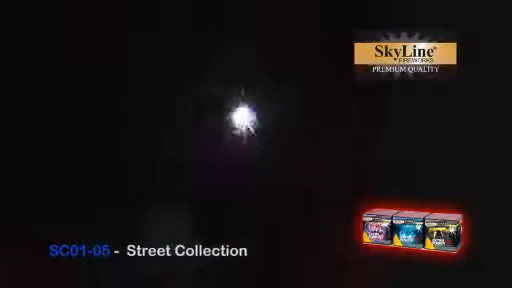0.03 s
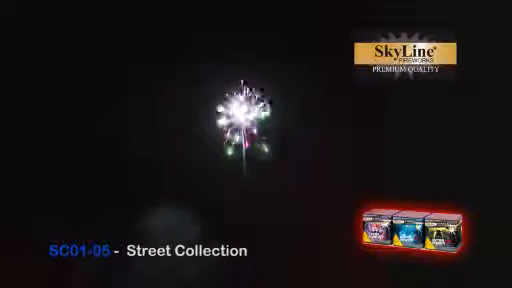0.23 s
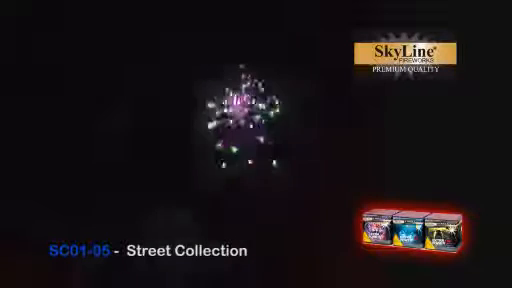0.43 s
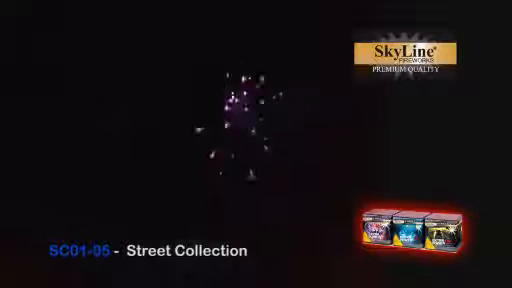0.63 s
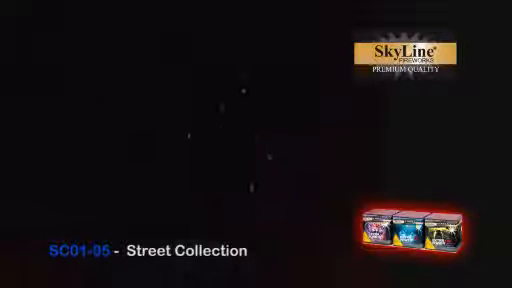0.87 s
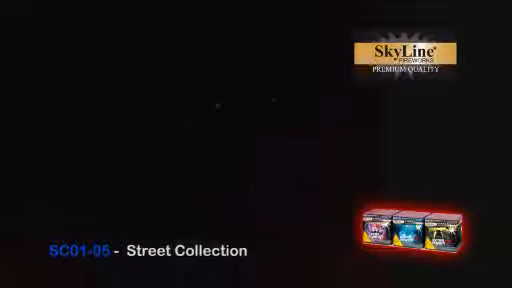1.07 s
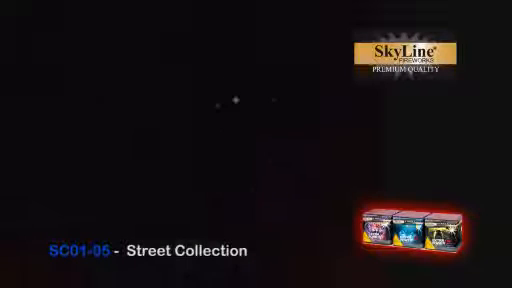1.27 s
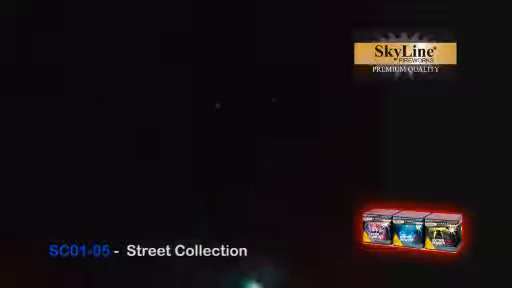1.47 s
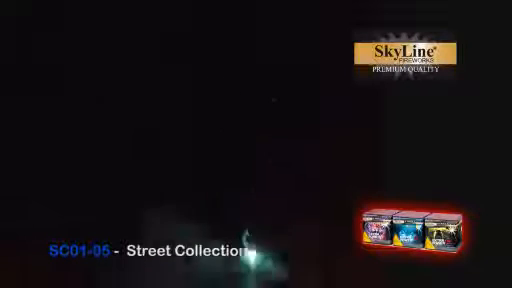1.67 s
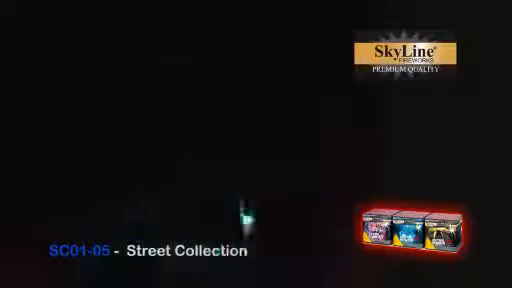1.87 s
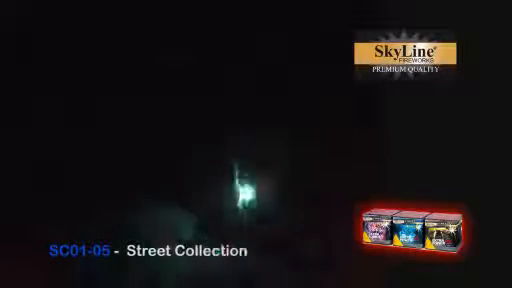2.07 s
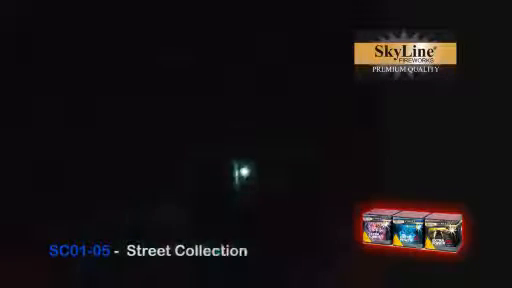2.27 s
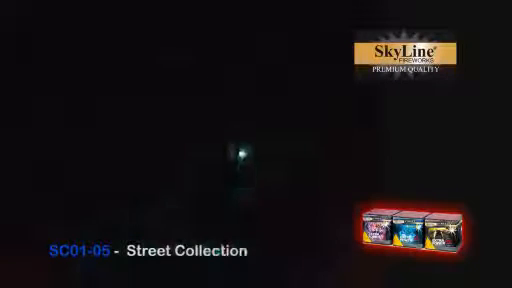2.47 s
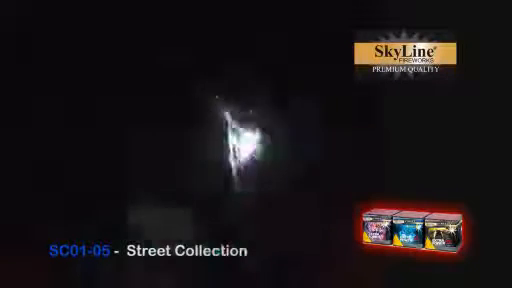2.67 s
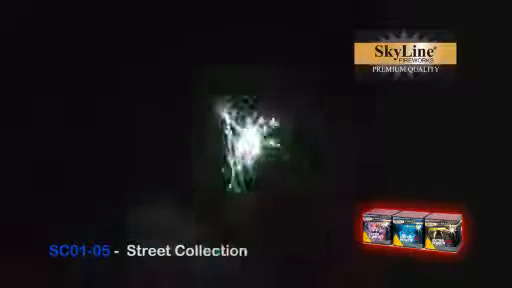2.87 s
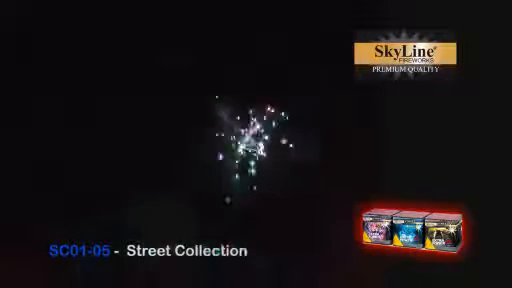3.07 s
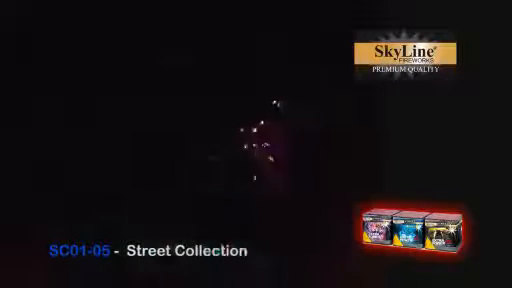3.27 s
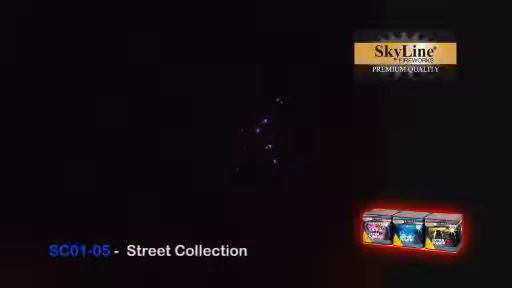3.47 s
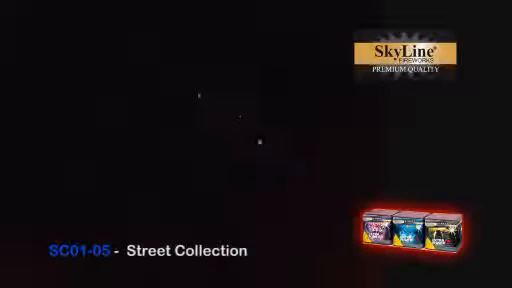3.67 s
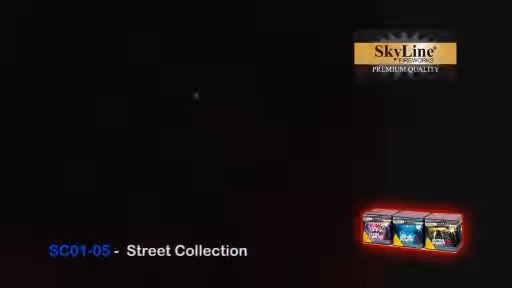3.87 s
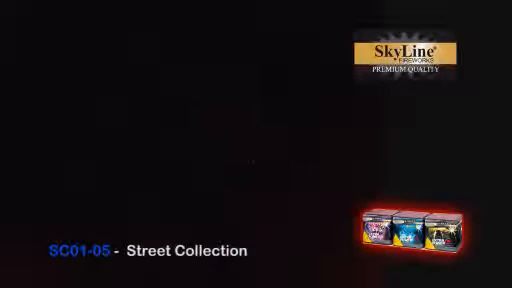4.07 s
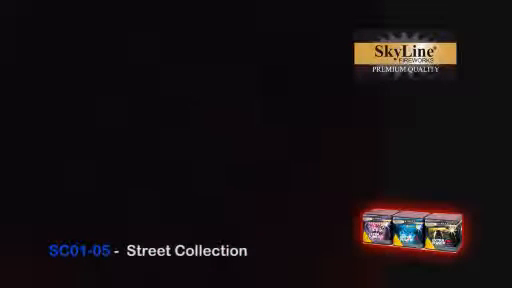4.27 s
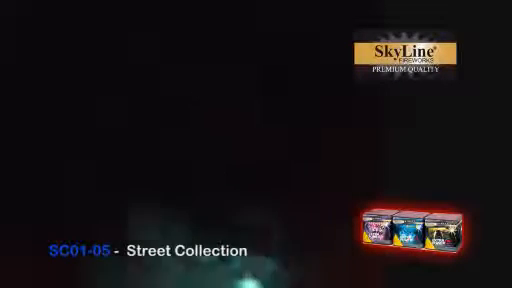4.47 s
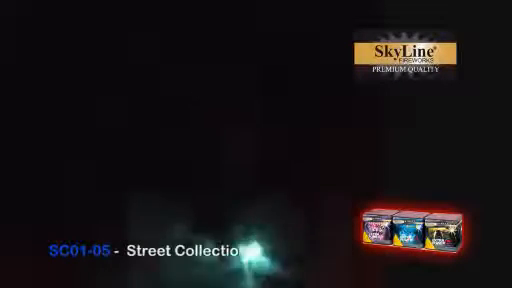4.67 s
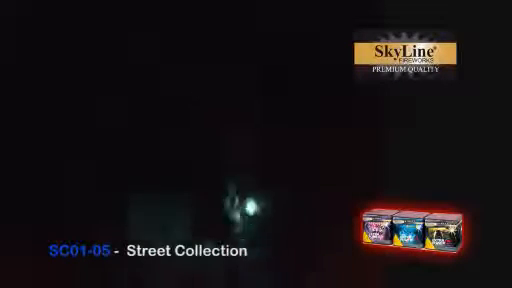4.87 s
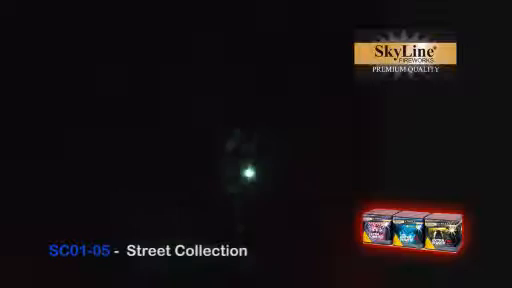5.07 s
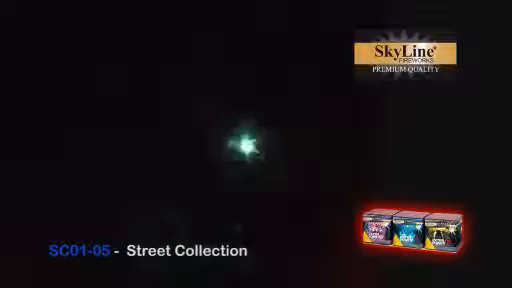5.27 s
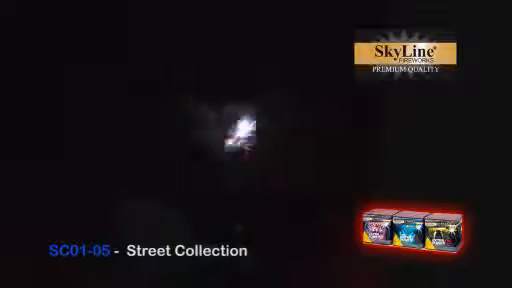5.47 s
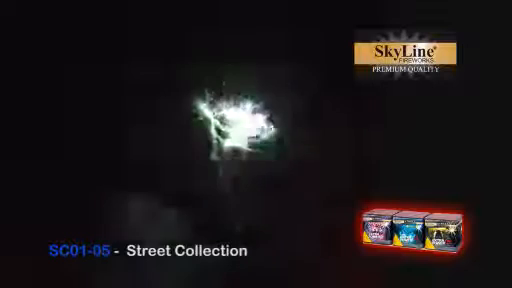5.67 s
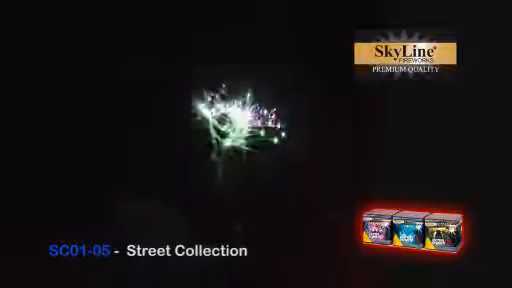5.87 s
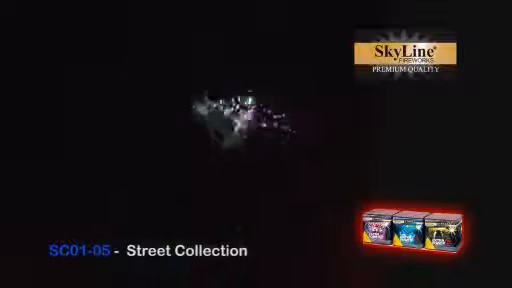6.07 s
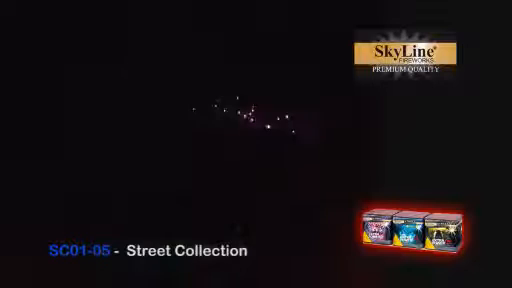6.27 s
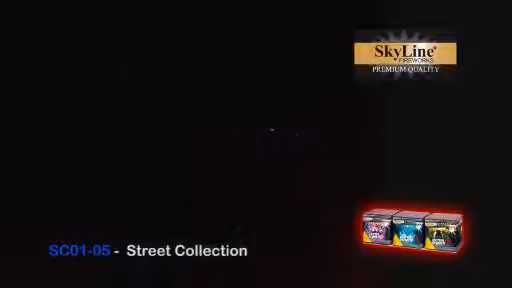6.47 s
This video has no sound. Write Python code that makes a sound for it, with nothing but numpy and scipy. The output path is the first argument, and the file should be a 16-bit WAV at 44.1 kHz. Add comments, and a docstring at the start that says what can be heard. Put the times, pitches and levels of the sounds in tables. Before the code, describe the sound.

Three sharp firework bangs crack across a quiet night, each followed by fluttering echoes and a fading wash, with two softer launch pops between them.

```python
"""Open surroundings at night: a firework cake fires, three sharp bursts in the sky alternating with two lifts.
A burst is an N-shaped shock; a lift is a muzzle crack plus the dull thump of the tube's air column.
Each shot also returns via the ground (a burst) or the cake (a lift), as slaps from buildings, and as a
long wash of scattered sound that loses its treble to the air. An added reverb effect gives every shot the same
fluttering echoes. Filtered noise makes the quiet night; an inverting microphone thins the bass and cuts the top."""
import sys
import numpy as np
from scipy import signal
from scipy.fft import rfft, irfft
from scipy.io import wavfile
from scipy.ndimage import uniform_filter1d

SR = 44100
rng = np.random.default_rng(int(sys.argv[2]) if len(sys.argv) > 2 else 0)


def wrap_up_sound(samples):
    """Save the sound to the file named by the first command line argument, as 16-bit audio."""
    columns = np.atleast_2d(samples).T
    # keep every value between -1 and 1, then stretch to whole-number steps
    tamed = np.clip(columns, -1, 1)
    steps = np.round(tamed * 32767).astype(np.int16)
    wavfile.write(sys.argv[1], SR, steps)


N = 287973

# Levels are ahead of the microphone.
# Night noise spectrum. Each row: frequency in Hz, relative density in dB per Hz.
NIGHT_SPECTRUM = [(24, 6), (45, 4.5), (198, -3), (569, -16), (1020, -10), (1130, -18), (10000, -35.5),
                  (11000, -32), (14300, -80), (22000, -120)]
# Zones of scatterers, each swelling in and dying away: ground near the listener, the whole landscape,
# nearby houses, far buildings. Each row: arrival in s, rise in s, t60 in s, level in dB after bursts,
# level in dB after lifts.
SCATTER_ZONES = [(0, 0.0011, 0.05, -3, -11), (0, 0.0043, 5.4, -29.5, -30.5), (.054, .011, .85, -18, -20),
                 (0.501, 0.16, 2.1, -33, -29)]
# Colour of all scattered sound. Each row: band centre in Hz, gain in dB after bursts, gain in dB after lifts,
# loss in dB per s of delay.
SCATTER_COLOUR = [(49.3, -9.5, -6.5, 3.5), (113, 1.5, 0.5, -0.5), (200, 1, -11, 3), (278, 2.5, 10.5, 5),
                  (520, -7, -6.5, -0.5), (1000, -1.5, -10, -1), (1580, 2, 9.5, 0.5), (2180, -1, 14, 3),
                  (2800, 2, 1, 3), (4100, 2.5, 3, 7), (5090, 5, 2.5, 13), (5970, 2, 2, 9.5),
                  (6950, -1, 5.5, 23.5), (9500, -0.5, -4, 27)]
# Slaps from buildings, after bursts and after lifts. Each row: delay in s, gain in dB before filtering,
# corner in Hz of each of two low-passes, t60 in s of the rough wake behind the front.
BURST_BUILDING_SLAPS = [(.038, -32, 4000, .01), (.046, -35, 1500, .01), (.49, -43, 1500, .02),
                        (.5708, -33.5, 3000, .1), (.73, -41, 1200, .02), (2.366, -46, 900, .02)]
LIFT_BUILDING_SLAPS = [(.1845, -16, 900, .002), (.205, -25, 900, .002), (.255, -22, 900, .002),
                       (.3103, -21, 900, .002), (.358, -17, 900, .002), (.3644, -22, 900, .002),
                       (.388, -32, 900, .002), (.586, -18, 1200, .012), (.5965, -24, 1800, .012),
                       (.648, -28, 1500, .004), (.667, -28, 1500, .004), (.72, -31, 2000, .004),
                       (1.04, -27, 900, .002), (1.1, -30, 900, .002)]
# Echoes of the added reverb effect, alike for every shot, in two families, one per flutter gap.
# Each row of a family: delay in ms, signed gain before the flutter.
REVERB_ECHOES = [
    [(57.1, .18), (78.89, .18), (104.78, -.08), (117.82, .13), (130.88, .065), (143.9, .03), (156.96, .025)],
    [(68.8, -.165), (86.12, .085), (105.35, -.125), (124.58, -.06), (182.27, -.025)],
]
# Lifts. Each row: start in s, muzzle crack gain in dB, crack bounce gain in dB (both on the filtered crack),
# tube thump peak in dB.
LIFT_SHOTS = [(1.38298, -11, -21, -24), (4.45976, -8, -11, -23)]
# Bursts. Each row: start in s, peak in dB, shock length in ms, suction as a share of the peak,
# ground bounce delay in ms, bounce gain in dB before dulling, extra delay of far slaps in ms.
BURST_SHOTS = [(.11443, 0, .77, .6, 4.94, -6, 0), (2.71334, 0, .79, .62, 4.42, -5, 4.6),
               (5.59872, -.4, .72, .5, 4.79, -6, 1.4)]

NIGHT_RMS_DB, NIGHT_WAVER_STEP = -70, 2000  # RMS before the waver; step in samples
WASH_GRAIN_DB = 1.2  # mean of the random lift in scatterer size
WASH_PATCHY_DB, WASH_PATCH_S = 1.7, .012
SLAP_BASS_HZ, FAR_SLAP_S = 120, .1  # slaps later than this count as far
WAKE_DB = -23  # spread per sample, against the front
FLUTTER_GAPS_MS, FLUTTER_GAIN = (4.875, 6.576), .7
REVERB_TOP_HZ = 8500
TUBE_HZ, TUBE_T60_S, TUBE_PUSH_MS, TUBE_LAG_MS = 188, .017, 2.3, .85
MUZZLE_HZ, MUZZLE_T60_S, MUZZLE_DB = 2642, .0014, -7  # dB against the unfiltered crack
SECOND_CRACK_MS = .38
MIC_LOW_HZ, MIC_DAMPING, MIC_TOP_HZ = 145, .6, 10000
MIC_DIP_HZ, MIC_DIP_Q, MIC_DIP_SHARE = 7630, 2.2, .35
TOP_HZ = 10300


def undb(db):
    """Decibels to gain."""
    return 10 ** (np.asarray(db) / 20)


def place(pulse, start_s):
    """A silent track of N samples with the pulse starting at start_s."""
    return np.pad(pulse, (int(round(start_s * SR)), N))[:N]


def dull(x, hz):
    """Gentle first-order low-pass."""
    return signal.lfilter(*signal.butter(1, min(hz, .45 * SR), fs=SR), x)


def ring(hz, t60_s):
    """One decaying mode, 0.1 s long."""
    t = np.arange(SR // 10) / SR
    return np.sin(2 * np.pi * hz * t) * np.exp(-np.log(1000) * t / t60_s)


def shape_spectrum(x, hz, gain):
    """Weight the spectrum, interpolating over log frequency."""
    f = np.maximum(np.fft.rfftfreq(len(x), 1 / SR), 1)
    return rfft(x) * gain(np.log(f), np.log(hz))


def band(x, hz, k):
    """Band k of a bank of overlapping slopes around the centres hz; the bands add up to x."""
    is_band = np.arange(len(hz)) == k
    return irfft(shape_spectrum(x, hz, lambda f, centres: np.interp(f, centres, is_band)), len(x))


def night():
    """Quiet background: shaped noise whose level wavers slowly."""
    hz, db = np.transpose(NIGHT_SPECTRUM)
    white = rng.standard_normal(N)
    x = irfft(shape_spectrum(white, hz, lambda f, points: undb(np.interp(f, points, db))), N)
    steps = np.repeat(rng.standard_normal(N // NIGHT_WAVER_STEP + 1), NIGHT_WAVER_STEP)
    waver = uniform_filter1d(steps, size=NIGHT_WAVER_STEP)[:N]
    return undb(NIGHT_RMS_DB + .68 * waver) * x / x.std()


def patches(size):
    """Slow chance with spread near 1: scatterers stand in clumps."""
    step = int(WASH_PATCH_S * SR)
    steps = np.repeat(rng.standard_normal(size // step + 1), step)
    return 1.2 * uniform_filter1d(steps, step)[:size]


def scattered_wash(t, column):
    """Response of many small scatterers: noise under the zones' decays, coloured band by band."""
    power = 0
    for arrival_s, rise_s, t60_s, *db in SCATTER_ZONES:
        decay = undb(db[column] - 60 * np.maximum(t - arrival_s, 0) / t60_s)
        power = power + np.clip((t - arrival_s) / rise_s, 0, 1) * decay ** 2
    # scatterers of uneven size
    dust = rng.standard_normal(len(t)) * undb(WASH_GRAIN_DB * rng.exponential(size=len(t)))
    dust *= np.sqrt(power / (SR / 50)) / dust.std()  # zone levels refer to 20 ms of sound
    centres_hz = np.array(SCATTER_COLOUR)[:, 0]
    wash = 0
    for k, row in enumerate(SCATTER_COLOUR):
        level_db = row[1 + column] - row[-1] * t + WASH_PATCHY_DB * patches(len(t))
        wash = wash + undb(level_db) * band(dust, centres_hz, k)
    return wash


def building_slap(t, delay_s, slap_db, top_hz, t60_s):
    """One wall's reflection: a front and a rough decaying wake, both band-limited."""
    wake_t = t[:SR // 5]
    wake = rng.standard_normal(len(wake_t)) * undb(WAKE_DB - 60 * wake_t / t60_s)
    raw = place(undb(slap_db) * np.append(1, wake), delay_s)[:len(t)]
    slap = dull(dull(raw, top_hz), top_hz)
    return slap - dull(slap, SLAP_BASS_HZ)  # walls of finite size return little bass


def surroundings(slaps, column, late_ms=0):
    """Response of the far surroundings: scattered wash plus single slaps; column 0 for bursts, 1 for lifts."""
    t = np.arange(3 * SR) / SR
    response = scattered_wash(t, column)
    for delay_s, slap_db, top_hz, t60_s in slaps:
        extra_s = (delay_s > FAR_SLAP_S) * late_ms / 1000
        response += building_slap(t, delay_s + extra_s, slap_db, top_hz, t60_s)
    return response[:len(t) - SR // 4]


def reverb_effect(x):
    """Added reverb: all-passes turn each echo into a flutter, an inverted front then fading repeats one gap apart."""
    out = 0
    for gap_ms, echoes in zip(FLUTTER_GAPS_MS, REVERB_ECHOES):
        taps = np.zeros(int(round(gap_ms * SR / 1000)) + 1)
        taps[0], taps[-1] = -FLUTTER_GAIN, 1
        response = sum(gain * place(np.ones(1), ms / 1000)[:SR // 5] for ms, gain in echoes)
        flutter = signal.lfilter(taps, taps[::-1], np.pad(response, (0, SR // 5)))
        out = out + signal.fftconvolve(x, flutter)[:N]
    return dull(out, REVERB_TOP_HZ)


def lift(crack_db, second_db, thump_db, crack_ms=.065):
    """A crack and short ring at the muzzle, one thump of the tube's air column; and the crack's bounce off the cake."""
    ms = np.arange(SR // 10) / SR * 1000
    crack = np.exp(-ms / crack_ms) - undb(MUZZLE_DB) * ring(MUZZLE_HZ, MUZZLE_T60_S)
    crack = dull(crack, hz=6360) - dull(crack, hz=520)  # a small opening, heard along the ground
    second = place(crack, SECOND_CRACK_MS / 1000)[:len(ms)]
    push = np.sin(np.pi * np.clip((ms - TUBE_LAG_MS) / TUBE_PUSH_MS, 0, 1)) ** 2
    thump = signal.fftconvolve(push, ring(TUBE_HZ, TUBE_T60_S))[:len(ms)]
    thump /= np.abs(thump).max()
    return undb(crack_db) * crack - undb(thump_db) * thump, undb(second_db) * second


def burst(db, length_ms, suction, bounce_ms, bounce_db, release_ms=.42, ground_hz=2300):
    """N-shaped shock: a jump, a ramp into suction, a soft release; and its duller bounce off the ground."""
    ms = np.arange(SR // 50) / SR * 1000
    ramp = 1 - (1 + suction) * ms / length_ms
    release = -suction * np.exp(-(ms - length_ms) / release_ms)
    shock = undb(db) * np.where(ms < length_ms, ramp, release)
    bounce = place(dull(shock, ground_hz), bounce_ms / 1000)[:len(ms)]
    return shock, undb(bounce_db) * bounce


def scene():
    """Bursts go off in different places and meet new scatterers; the tubes stay put."""
    direct, far = np.zeros(N), np.zeros(N)
    ground_view = surroundings(LIFT_BUILDING_SLAPS, column=1)
    shots = []
    for start_s, *row, late_ms in BURST_SHOTS:
        sky_view = surroundings(BURST_BUILDING_SLAPS, column=0, late_ms=late_ms)
        shots.append((start_s, burst(*row), sky_view))
    for start_s, *row in LIFT_SHOTS:
        shots.append((start_s, lift(*row), ground_view))
    for start_s, (pulse, bounce), view in shots:
        direct += place(pulse + bounce, start_s)
        far += place(signal.fftconvolve(pulse, view), start_s)  # the close bounce reaches only the listener
    return (direct + reverb_effect(direct) + far + night())[None]


def record(dry):
    """An inverting microphone with little bass and a dip in the treble; the top is cut steeply."""
    w = 2 * np.pi * MIC_LOW_HZ
    high_pass = signal.bilinear([1, 0, 0], [1, 2 * MIC_DAMPING * w, w * w], SR)
    thin = signal.lfilter(*high_pass, -dry)
    dip = signal.lfilter(*signal.iirpeak(MIC_DIP_HZ, MIC_DIP_Q, fs=SR), thin)
    soft = dull(thin - MIC_DIP_SHARE * dip, MIC_TOP_HZ)
    return signal.sosfilt(signal.ellip(10, .2, 60, TOP_HZ, fs=SR, output="sos"), soft)


dry = scene()
out = record(dry)
wrap_up_sound(out)
```